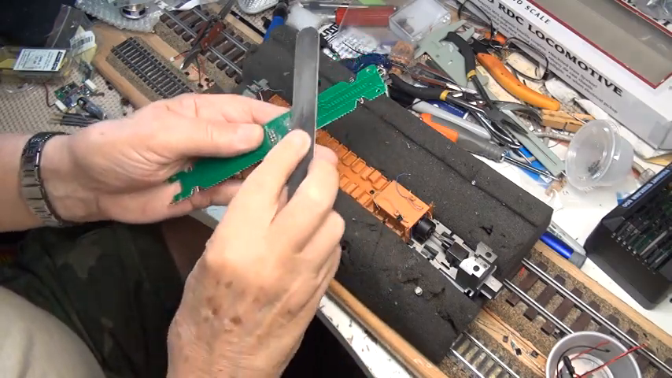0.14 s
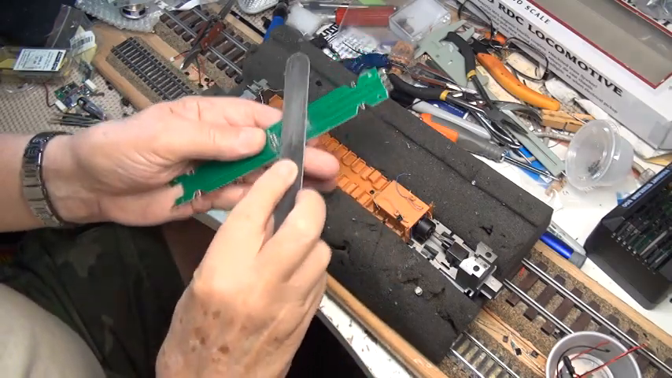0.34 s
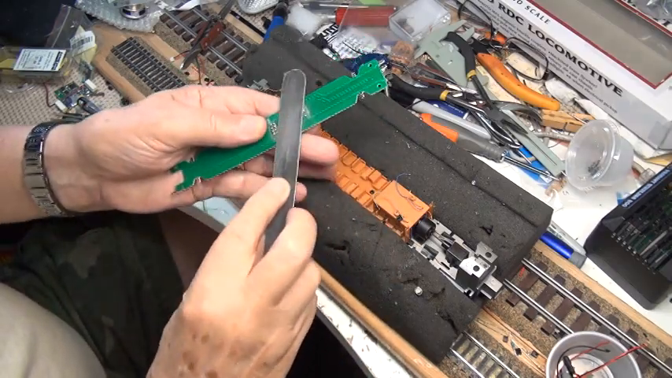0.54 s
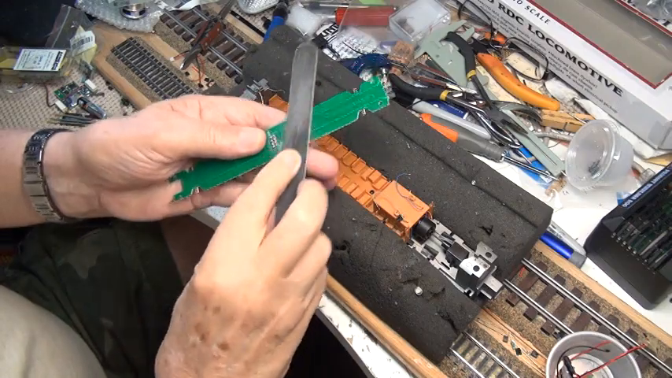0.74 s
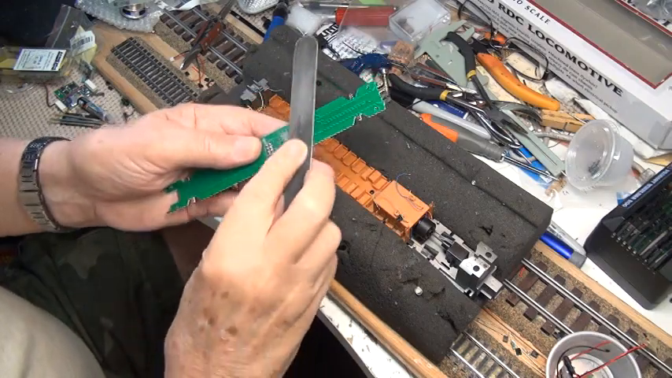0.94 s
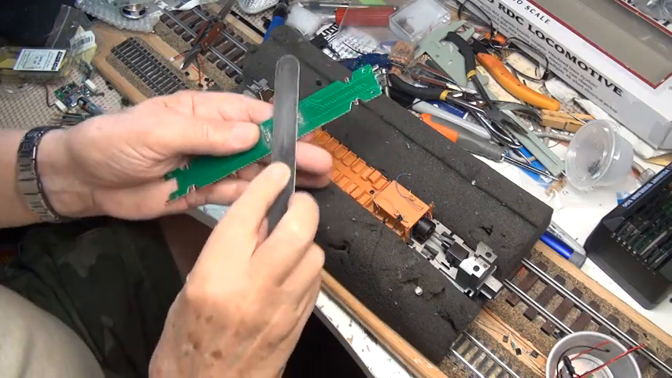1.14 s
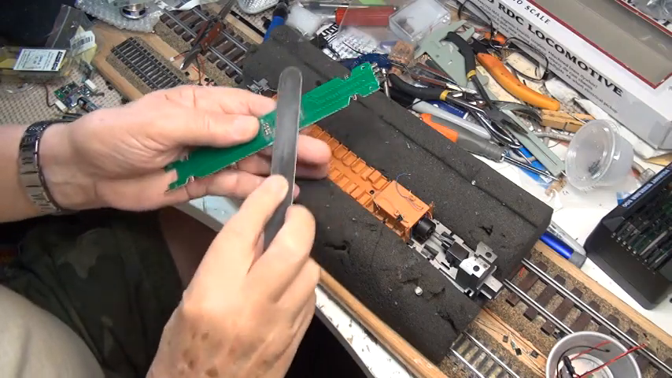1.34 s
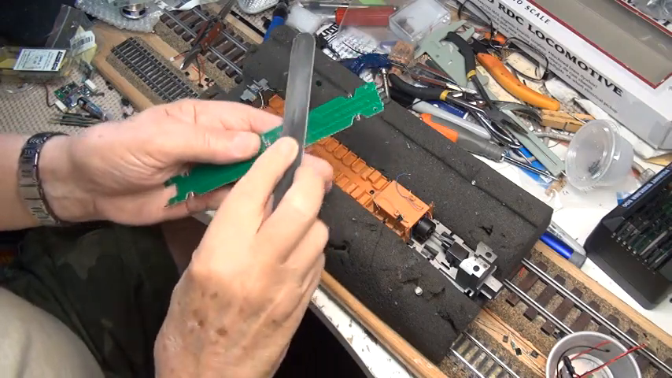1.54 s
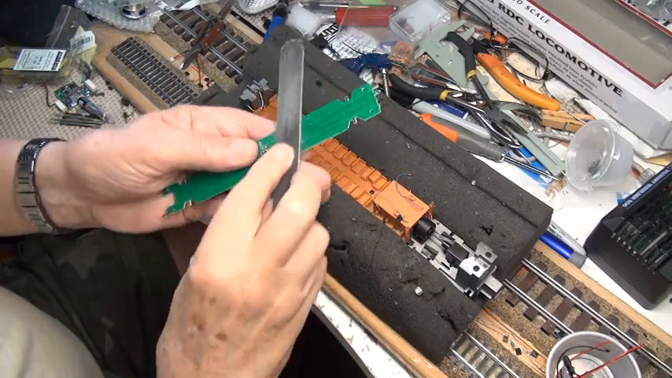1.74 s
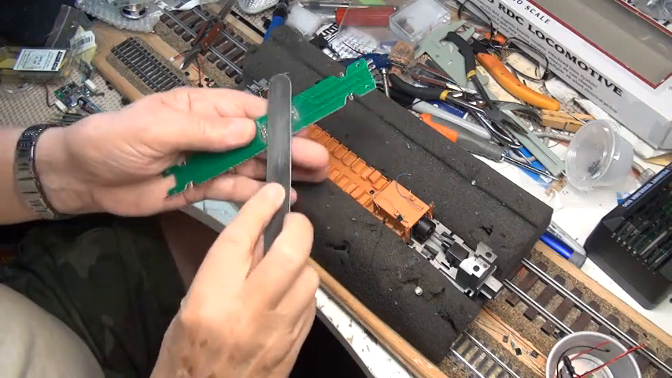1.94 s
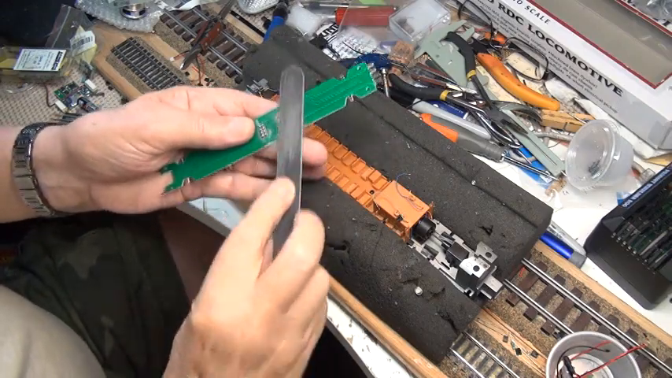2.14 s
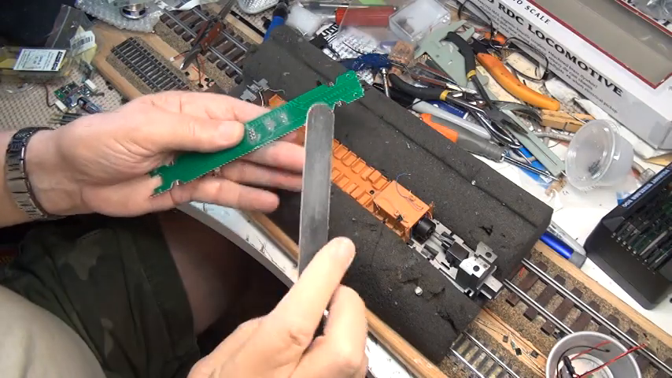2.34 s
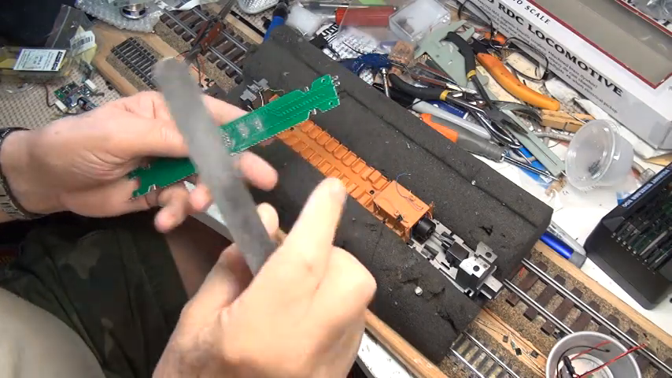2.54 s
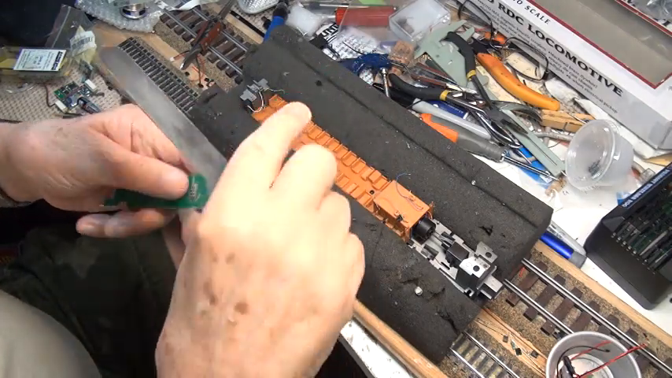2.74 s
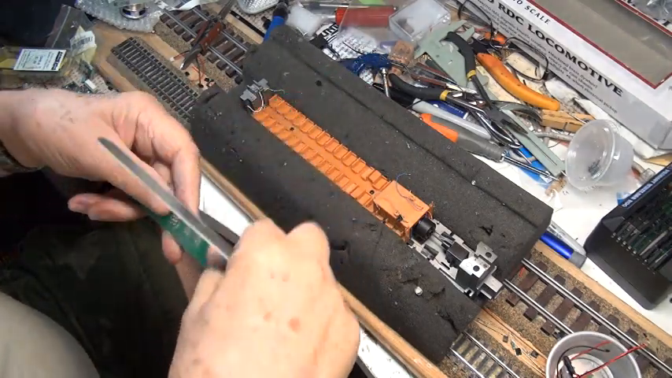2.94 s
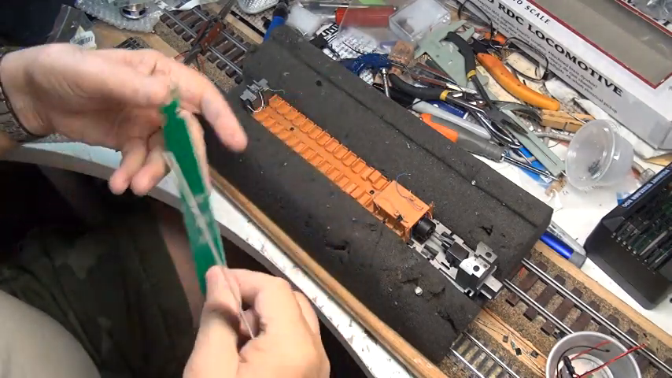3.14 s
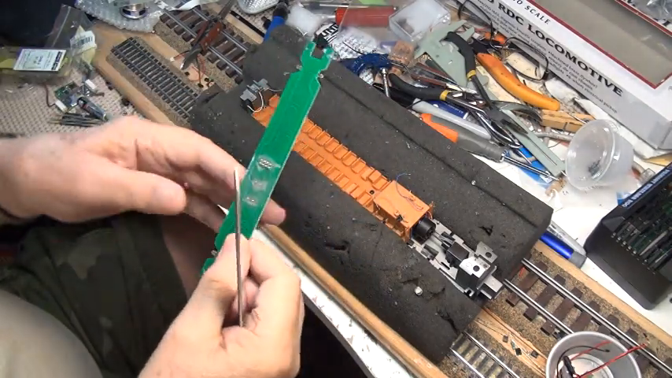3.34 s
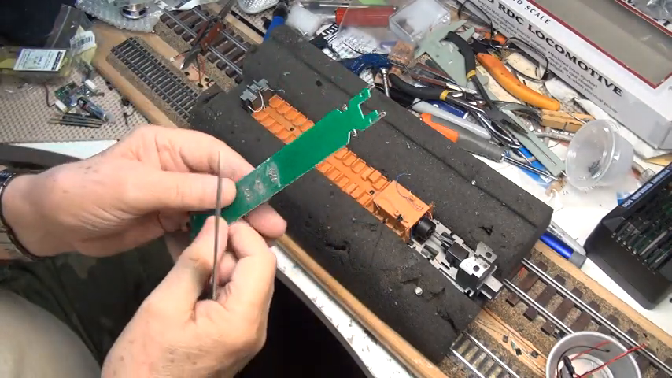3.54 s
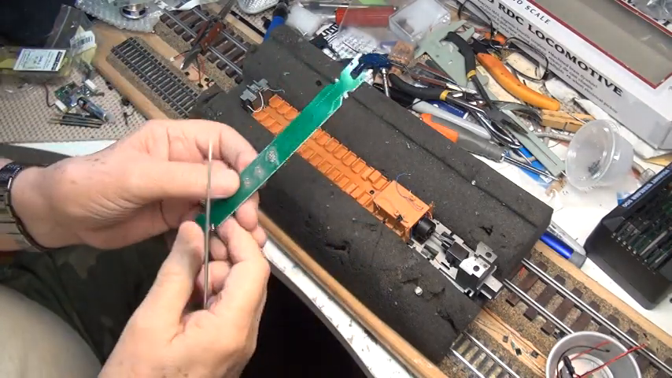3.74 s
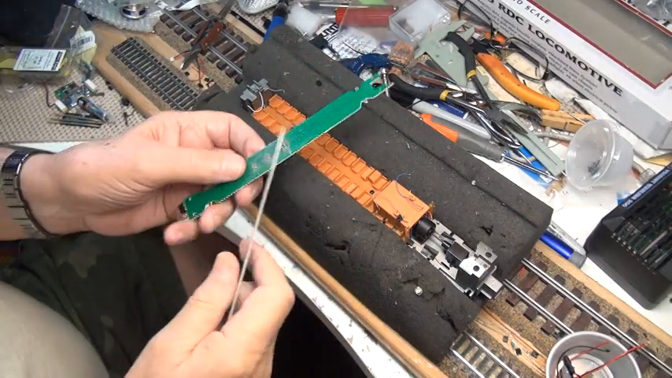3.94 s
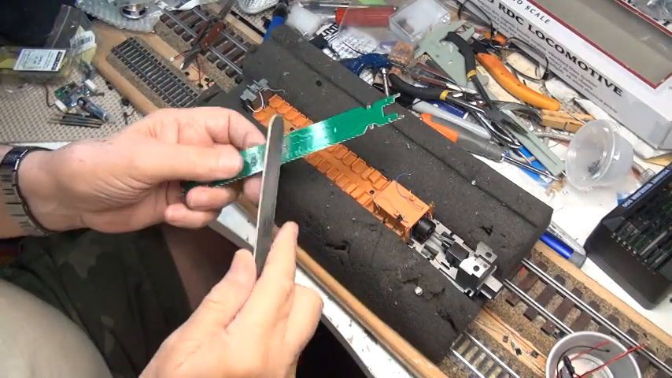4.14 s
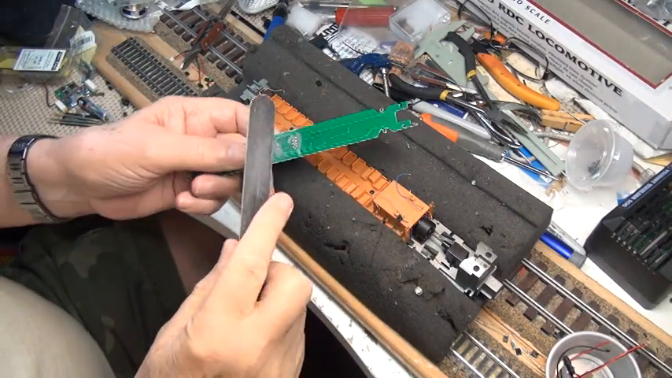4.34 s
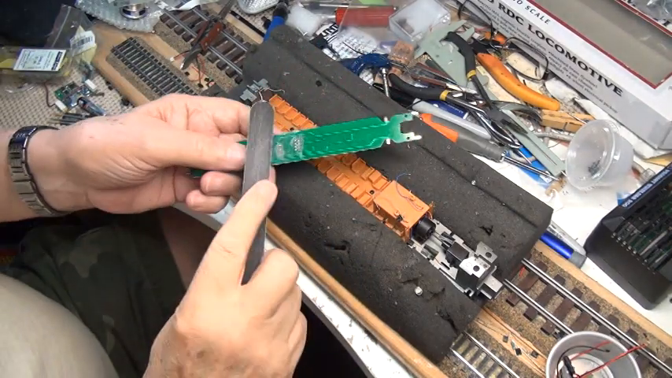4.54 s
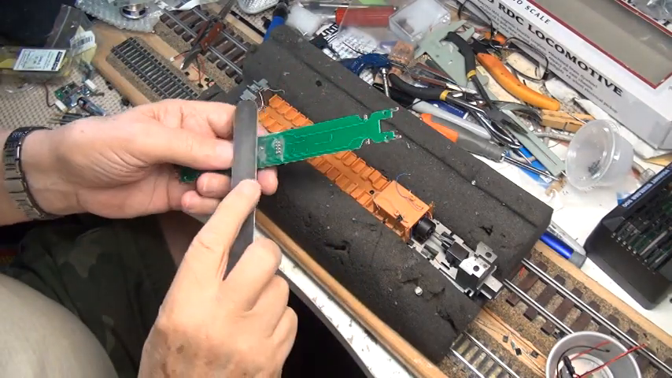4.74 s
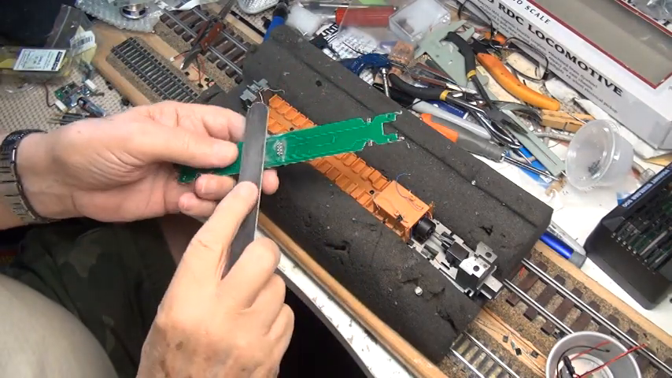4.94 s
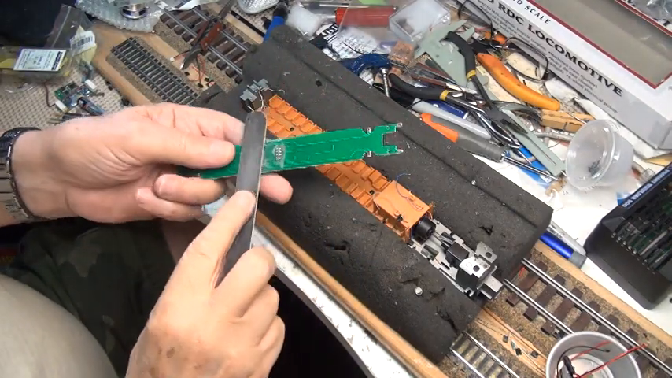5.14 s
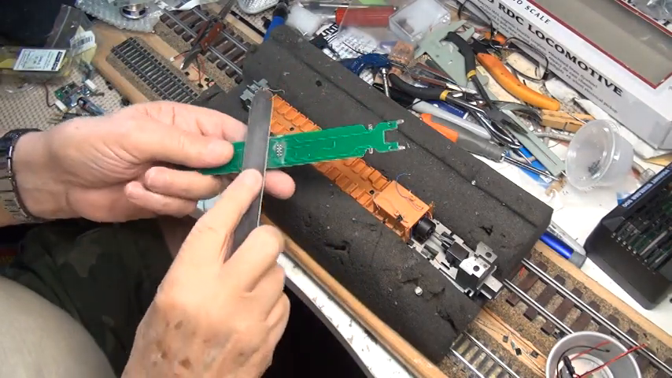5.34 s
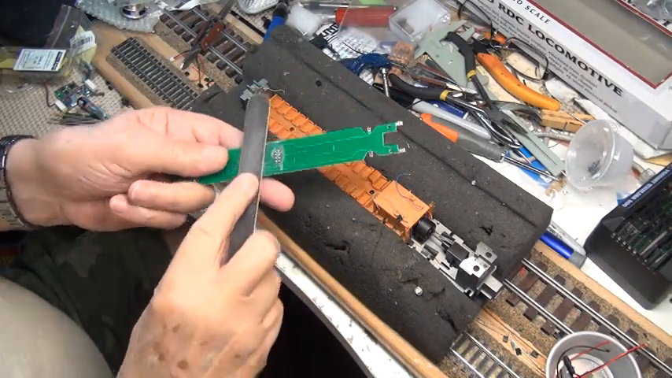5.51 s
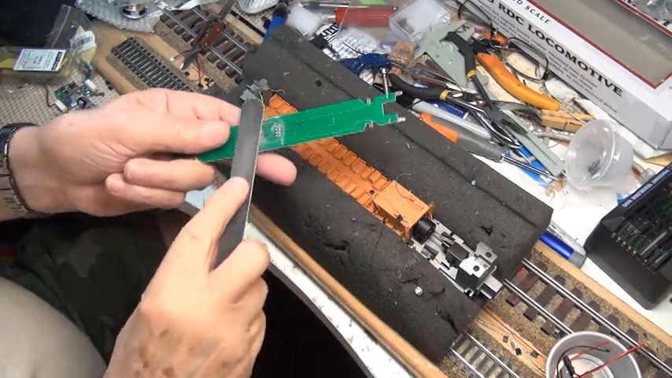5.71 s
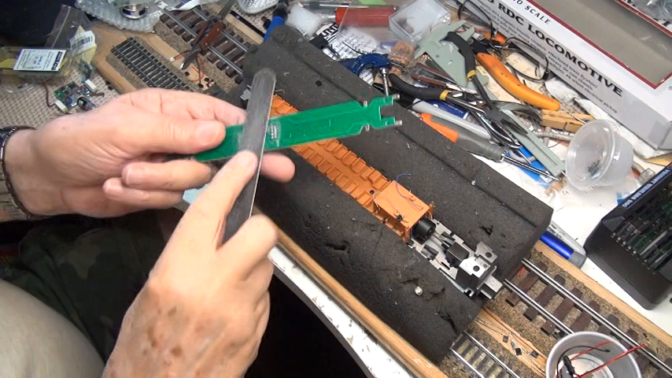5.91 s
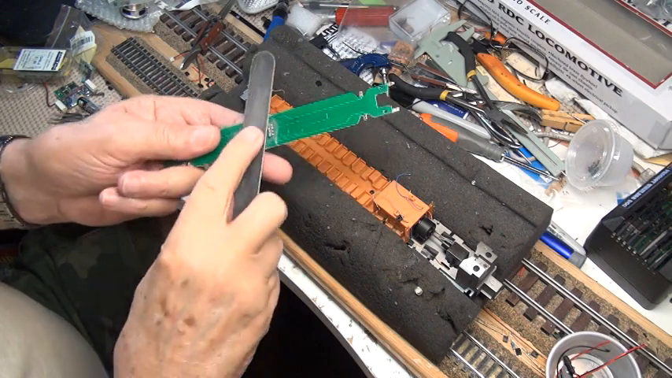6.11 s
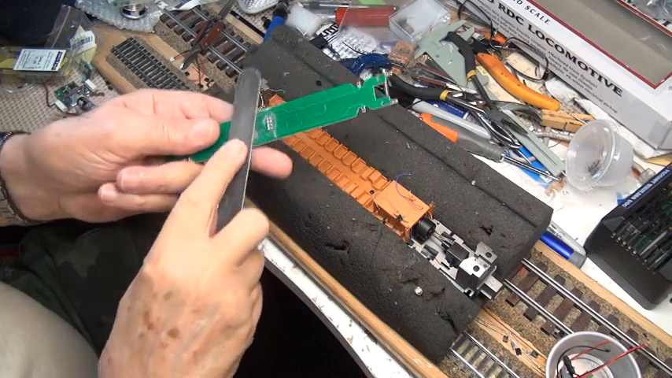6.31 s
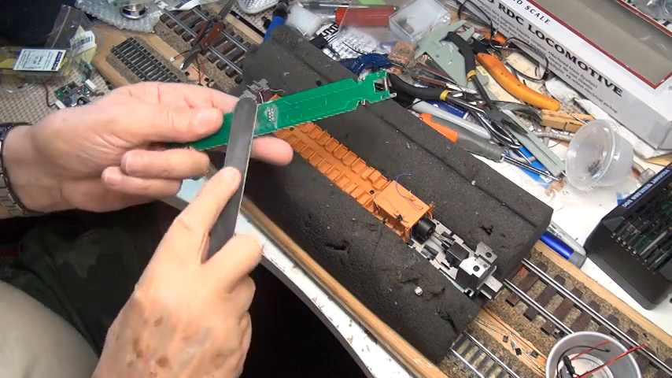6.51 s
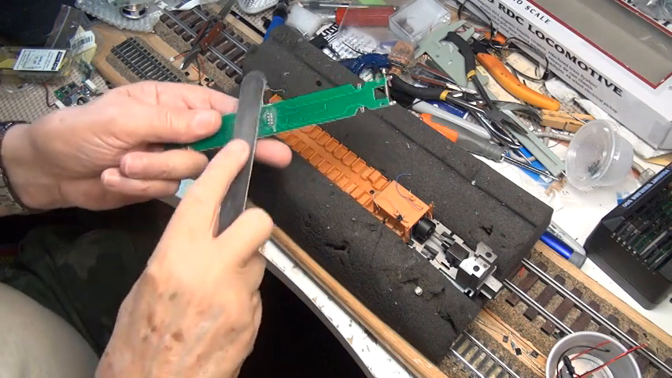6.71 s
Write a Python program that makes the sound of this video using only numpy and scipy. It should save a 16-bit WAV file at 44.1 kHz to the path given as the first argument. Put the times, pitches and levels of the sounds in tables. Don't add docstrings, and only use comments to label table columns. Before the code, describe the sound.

Scratchy metal filing in fast alternating strokes, a soft pause with light taps, then brighter filing again over a faint steady tone.

```python
import sys
import numpy as np
from scipy import signal
from scipy.fft import rfft, irfft, next_fast_len
from scipy.io import wavfile
from scipy.ndimage import uniform_filter1d, map_coordinates

SR = 44100
rng = np.random.default_rng(int(sys.argv[2]) if len(sys.argv) > 2 else 0)


def ratio_of_db(decibels):
    return 10 ** (np.asarray(decibels, float) / 20)


def transcribe(u):
    v = np.clip(np.atleast_2d(u).T, -1, 1)
    q = np.round(v * 32767).astype(np.int16)
    wavfile.write(sys.argv[1], SR, q)


N = 298557
T = np.arange(N) / SR


def unit(x):
    return x / np.sqrt(np.mean(x ** 2) + 1e-20)


def along(points, hz):
    f, v = np.transpose(points)
    return np.interp(np.log(hz + 1), np.log(f + 1), v)


def curves(rows):
    s, *cols = np.transpose(rows)
    return [np.interp(T, s, c) for c in cols]


def wobble(rate):
    knots = rng.standard_normal(int(N * rate / SR) + 4)
    return map_coordinates(knots, [T * rate])


def filtered(x, response):
    m = next_fast_len(N + 8192)
    return irfft(rfft(x, m) * response(np.fft.rfftfreq(m, 1 / SR)), m)[..., :N]


def causal(spectrum):
    def response(hz):
        cep = irfft(np.log(ratio_of_db(along(spectrum, hz)) + 1e-6))
        cep[1:len(hz) - 1] *= 2
        cep[len(hz):] = 0
        return np.exp(rfft(cep))
    return response


def mode(f, centre_hz, width_hz):
    return 1j * f * width_hz / (centre_hz ** 2 - f * f + 1j * f * width_hz)


def mottled(x, depth_db, twist, hz_bins, frames):
    z = signal.stft(x, nperseg=256)[2]
    field = rng.standard_normal((2, *z.shape))
    field = uniform_filter1d(uniform_filter1d(field, hz_bins, 1), frames, 2)
    field = uniform_filter1d(field, 2, 2) / field.std()
    patches = ratio_of_db(depth_db * field[0]) * np.exp(1j * twist * field[1])
    return signal.istft(z * patches, nperseg=256)[1][:N]


def filing():
    biting, progress, blade_hz, ring_db = strokes()
    lifted_db = np.clip(-110 * (T - sum(FIRST_STROKES[-1][:2])), -60, 0)
    idle = ratio_of_db(-47 + np.where(T < SECOND_STROKES[0][0], lifted_db, 0))
    pressure = np.hypot(biting, idle)
    force = teeth(rate=1100, spread_db=3.8, clump_db=1.5, give=4.5)

    start_db, end_db, rest_db, loose_db = -14, -9, -1, 8
    board_db = start_db + (end_db - start_db) * progress
    board_db = board_db + (rest_db - board_db) * (idle / pressure) ** 2
    board_db = board_db + loose_db * ((T > LIGHT_TOUCHES[0][0]) & (T < 5.02))

    ring = blade_ring(force, blade_hz, ring_db)
    return pressure * (wire_rasp(force) + board_shake(force, ring, board_db))


# (start [s], length [s], rasp level [dB], fall during stroke [dB], blade pitch at start [Hz])
FIRST_STROKES = [(-.025, 0.061, -17, 9, 1020), (0.071, 0.1, -19.5, 4, 2260), (.222, 0.099, -18.5, 6, 1030),
                 (0.347, 0.11, -16, 9, 1840), (0.49, 0.099, -18.5, 5.5, 940),
                 (0.618, .115, -19.5, 4.5, 1510), (0.766, 0.1, -19, 8, 1080), (0.891, .1, -17.5, 6.2, 1440),
                 (1.039, 0.082, -17.6, 5, 1055), (1.158, 0.11, -20, 1.7, 1610),
                 (1.314, 0.089, -20.5, -1.7, 956), (1.439, 0.11, -16.5, 6.5, 1970),
                 (1.58, 0.1, -17, 9, 934), (1.71, 0.11, -21.5, 2.2, 1600), (1.858, 0.1, -19.5, 3, 946),
                 (1.993, 0.1, -16.5, 14, 1830), (2.125, 0.13, -20.5, 0.3, 950)]
LIGHT_TOUCHES = [
    (4.78, .11, -53, -8, 2000),
    (4.936, 0.043, -31, 3.5, 2000),
    (5.0, .11, -51, 3, 2000),
    (5.124, 0.054, -30.5, 11.5, 2000),
    (5.224, 0.12, -28.5, 2.5, 2000),
]
SECOND_STROKES = [(5.39, 0.085, -19.5, 6, 2000), (5.517, 0.082, -16, 9, 2650),
                  (5.653, 0.078, -17.5, 4, 1350), (5.773, 0.1, -19, 4, 2400),
                  (5.927, 0.077, -16.5, 5.5, 1060), (6.052, 0.085, -21.5, 0.2, 2230),
                  (6.191, 0.086, -16.5, 6.5, 1320), (6.311, 0.1, -21.5, 0.5, 2400),
                  (6.466, 0.093, -14, 14.5, 1320), (6.596, 0.085, -20, 2.5, 2650),
                  (6.739, 0.038, -15.5, 3.5, 1700)]


def strokes():
    pressure, progress = np.zeros(N), np.ones(N)
    hz, ring_db = np.full(N, 1500.), np.zeros(N)
    grips = zip(
        (FIRST_STROKES, LIGHT_TOUCHES, SECOND_STROKES),
        (-26.5, -23, -20.5),
        (-.4, 1.1, 4.0),
        (0.029, 0.033, 0.042),
        (859, 700, 745),
        (.05, .1, 0.11), (0.907, 0.73, .92))
    for rows, share_db, law, bite_s, let_go_db, u0, u1 in grips:
        ends = [row[-1] for row in rows[1:]] + [2400]
        for (s, length, db, sag_db, hz0), hz1 in zip(rows, ends):
            now = slice(*np.searchsorted(T, [s, s + length + .2]))
            t = T[now] - s
            u = np.clip(t / length, 0, 1)
            fall_db = sag_db * u ** 1.27 + let_go_db * np.clip(t - length, 0, 1)
            bite = np.clip(t / bite_s, 0, 1) ** 0.76
            pressure[now] = np.maximum(pressure[now], bite * ratio_of_db(db - fall_db))
            travel = np.clip((u - u0) / (u1 - u0), 0, 1)
            free = hz0 ** law + (hz1 ** law - hz0 ** law) * (1 - np.cos(np.pi * travel)) / 2
            progress[now], hz[now] = u, free ** (1 / law)
            ring_db[now] = share_db - 3.5 * (1 - np.sin(np.pi * travel))
    return pressure, progress, hz, ring_db


# (time [s], share of single catches [0-1])
SINGLE_CATCHES = [
    (0, 0.41),
    (2.3, 0.4),
    (4.7, 0.22),
    (4.9, 0.66),
    (4.94, 0.3),
    (5.1, 0.5),
    (5.4, 0.45),
    (5.7, 0.2),
    (6.77, 0.29),
]


def teeth(rate, spread_db, clump_db, give):
    share = np.clip(curves(SINGLE_CATCHES)[0], 0, 1)
    catch = (rng.random(N) < rate / SR) * ratio_of_db(spread_db * rng.exponential(size=N))
    fading = signal.lfilter([1], [1, -np.exp(-1 / (.0003 * SR))], catch)
    bursts = fading * rng.standard_normal(N)
    force = np.sqrt(1 - share) * rng.standard_normal(N) + np.sqrt(share) * unit(bursts)
    force = unit(force * ratio_of_db(clump_db * wobble(350) + 0.53 * wobble(60)))
    return unit(np.tanh(force / give))


# (frequency [Hz], level [dB per Hz])
WIRES_BEFORE = [(1940, -47), (3300, -24), (5010, -6), (5440, -2), (6460, -0.5), (6970, 0.5), (7520, -7.5),
                (7960, -4), (9390, -1.5), (11300, -2), (12200, -6.5), (13200, -6.5), (14400, -9),
                (15000, -18)]
WIRES_AFTER = [(1940, -42.5), (3300, -10.5), (4070, -5.5), (4440, -20), (4920, -5), (6100, 4), (7420, 2),
               (8010, -4.5), (8640, 2.5), (9690, 1), (13100, -3.5), (15000, -12.5)]


def wire_rasp(force):
    touch = mottled(force, depth_db=2.5, twist=0, hz_bins=4, frames=7)
    before = unit(filtered(touch, causal(WIRES_BEFORE)))
    after = unit(filtered(touch, causal(WIRES_AFTER)))
    wires = np.where(T < 3.5, before, after)
    wires = filtered(wires, lambda f: 1 + ratio_of_db(-3) * mode(f, 9520, 400))
    top = filtered(wires, lambda hz: 1 / (1 + (7900 / (hz + 1)) ** 12))
    top_db = -2
    low_db = 10 * np.log10(1 - ratio_of_db(2 * top_db))
    return ratio_of_db(top_db - 1.15) * unit(top) + ratio_of_db(low_db - 0.8) * unit(wires - top)


def blade(force, hz, width_hz):
    turn = np.exp(2j * np.pi * np.cumsum(hz) / SR)
    pole = np.exp(-np.pi * width_hz / SR)
    held = signal.lfilter([1], np.poly([pole, pole]), force / turn)
    return unit((held * turn).real)


def blade_ring(force, blade_hz, ring_db):
    narrow, wide = blade(force, blade_hz, width_hz=190), blade(force, blade_hz, width_hz=380)
    low = np.where(T < LIGHT_TOUCHES[0][0], narrow, wide)
    high = ratio_of_db(-6.5) * blade(force, 2.6 * blade_hz, width_hz=240)
    ring = ratio_of_db(ring_db) * (low + high)
    return ratio_of_db(-4) * ring + ratio_of_db(-7.5) * filtered(ring, board)


# (frequency [Hz], width [Hz], level [dB])
BOARD_MODES = [(1350, 1500, 2.5), (2000, 730, 11.5), (3050, 300, 10.5), (3340, 450, 8.5), (4500, 860, 10)]


def board(f):
    return sum((-1) ** k * ratio_of_db(db) * mode(f, c, w) for k, (c, w, db) in enumerate(BOARD_MODES))


def board_shake(force, ring, board_db):
    shake = mottled(force, depth_db=1.6, twist=2.5, hz_bins=2, frames=9)
    loose = unit(filtered(shake, board))
    tight = unit(filtered(shake, lambda f: board(f) * (f / 3000) ** 0.23))
    body = ratio_of_db(board_db - 2.5) * np.where(T < 5.2, loose, tight) + ratio_of_db(3.5) * ring
    touch_gain = np.where(T < 5.02, 4, 2) * (T < SECOND_STROKES[0][0])
    free_end = ratio_of_db(4.5) * ring + ratio_of_db(board_db + 4.5) * touch_gain * force
    body = body + filtered(free_end * (T > LIGHT_TOUCHES[0][0]), lambda f: mode(f, 2050, 240))
    return filtered(body, lambda f: 1 - .65 * mode(f, 1630, 350))


# (time [s], wire peak level [dB], board knock level relative to the wire [dB])
SNAGS = [(0.2912, -9, -54), (0.373, -16, -26), (0.8244, -8, -32), (0.851, -7.5, -28), (1.946, -12, -30),
         (4.6635, -23, -2), (4.825, -27, -17), (4.8489, -27, -6.5), (4.8614, -39, -13), (4.8872, -23, -9.5),
         (5.151, -15.5, -17), (5.1612, -15.5, -12.5), (5.245, -16, -18), (5.2831, -16, -28),
         (5.3277, -16, -16), (5.3847, -21, -18), (5.404, -13, -13), (5.4286, -7, -29), (5.4559, -11, -24)]


def catches():
    out, tick, t = np.zeros(N + SR), np.arange(N) == 0, np.arange(300) / SR
    wire = filtered(tick, causal(WIRES_AFTER))[:300]
    plate = filtered(tick, board)[:300]
    for s, db, knock_db in SNAGS:
        burst = rng.standard_normal(300) * ratio_of_db(-60 * t / .0045)
        for body, level_db in ((wire, db + 1), (plate, db + knock_db + 4)):
            hit = np.convolve(burst, body)
            out[round(s * SR):][:len(hit)] += ratio_of_db(level_db) * hit / np.abs(hit).max()
    return out[:N]


# (middle time [s], half length [s], level [dB])
FINGER_SLIDES = [(2.29, 0.028, -47), (2.493, 0.09, -57), (2.548, 0.072, -42), (2.615, 0.03, -46),
                 (2.863, 0.011, -56), (2.93, 0.095, -53.5), (3.145, 0.045, -54), (3.24, 0.043, -61.5),
                 (3.594, 0.14, -59.5), (3.71, .05, -58), (3.868, 0.14, -55), (3.953, 0.031, -50.5),
                 (4.12, 0.0546, -48), (4.315, .13, -49.5), (4.506, 0.027, -44.5), (4.633, .06, -56),
                 (4.72, 0.013, -50), (4.797, 0.035, -46)]
# (frequency [Hz], level [dB per Hz])
SKIN_COLOUR = [(1470, -39), (2500, -1.5), (2850, -8.5), (4050, -2.5), (5210, -5.5), (6660, 2), (8580, -9),
               (9080, -4.5), (10100, -3), (14000, -6.5)]


def fingers():
    slides = sum(ratio_of_db(db - 21 * (np.abs(T - s) / half) ** 1.13) for s, half, db in FINGER_SLIDES)
    moving = (T > FINGER_SLIDES[0][0]) & (T < FINGER_SLIDES[-1][0])
    skin = rng.standard_normal(N) * ratio_of_db(1.5 * wobble(200))
    rub = mottled(skin, depth_db=3, twist=0, hz_bins=4, frames=12)
    return moving * (slides + ratio_of_db(-71)) * unit(filtered(rub, causal(SKIN_COLOUR)))


# (frequency [Hz], time to fall 60 dB [s])
ROOM_DECAY = [(500, .3), (4000, .26), (12000, .18)]


def room(x):
    hz, t, z = signal.stft(rng.standard_normal((2, SR // 2)), SR, nperseg=256)
    decay = ratio_of_db(-60 * t / along(ROOM_DECAY, hz)[:, None])
    tail = signal.istft(z * decay, SR, nperseg=256)[1]
    return signal.fftconvolve(x[None], tail / np.linalg.norm(tail[0]), axes=1)[:, :N]


# (frequency [Hz], level [dB per Hz])
HISS_COLOUR = [(15, -61), (25, -39), (85, -15), (260, -15.5), (365, -13.5), (416, -11.5), (682, -10.5),
               (862, -6.5), (982, -7), (1570, -10.0), (3340, -18.5), (7110, -24), (8310, -30), (12600, -33),
               (16400, -69.5), (22000, -120)][:-1] + [(16000, -50)]
# (frequency [Hz], likeness [0-1])
HISS_LIKENESS = [(60, 1.0), (130, 1.0), (290, 1), (640, 0.968), (1410, 0.88), (3100, 0.72), (6820, 0.84),
                 (15000, 0.67)]
# (time [s], frequency [Hz], level [dB])
STEADY_TONE = [
    (0, 863, -54.5),
    (2.3, 863, -54),
    (3.0, 861, -53),
    (4.5, 860.5, -55),
    (5.5, 860, -56.5),
    (6.77, 860, -57),
]
# (frequency [Hz], level [dB])
HUM_TONES = [(90, -76.5), (201, -76.5), (269, -71.5), (359, -70.5), (479, -72), (767, -69)]
# (start [s], end [s], frequency [Hz], level [dB])
LENS_WHINE = [
    (2.3, 2.62, 6110, -73),
    (2.95, 3.5, 7321, -74),
    (3.5, 4.17, 6094, -72),
    (2.6, 4.3, 7171, -82),
]


def air():
    turn = lambda hz: np.arccos(np.clip(along(HISS_LIKENESS, hz), -1, 1)) / 2
    spread = lambda hz: ratio_of_db(along(HISS_COLOUR, hz)) * [np.cos(turn(hz)), np.sin(turn(hz))]
    mid, side = filtered(rng.standard_normal((2, N)), spread)
    hiss = ratio_of_db(-50 + .3 * wobble(3)) * unit(np.array([mid + side, mid - side]))

    hz, db = curves(STEADY_TONE)
    phase = 2 * np.pi * np.cumsum(hz + 0.49 * wobble(5.88)) / SR
    tone_db = db + 0.21 * wobble(5.12) + np.array([[2.8], [-4.5]])
    tone = np.sqrt(2) * ratio_of_db(tone_db) * np.sin(phase + np.array([[.2], [-.2]]))

    hum = sum(ratio_of_db(db + 2.5 + 2.3 * wobble(3.9)) * np.sin(2 * np.pi * hz * T + 1.4 * wobble(2.95))
              for hz, db in HUM_TONES)
    whine = sum(ratio_of_db(db + 5.5 + 1.5 * wobble(8.1)) * ((T > t0) & (T < t1)) * np.sin(2 * np.pi * hz * T)
                for t0, t1, hz, db in LENS_WHINE)
    return hiss + tone + hum + whine


def scene():
    work = filing() + catches() + fingers()
    other = mottled(work, depth_db=-1.0, twist=2.81, hz_bins=3, frames=9)
    side = filtered(other, lambda hz: ratio_of_db(-10.5) / (1 + (4600 / (hz + 1)) ** 6))
    direct = work * ratio_of_db([[.2], [-.2]]) + np.array([side, -side])
    return direct + ratio_of_db(-19) * room(work) + air()


def roll_off(x):
    return signal.sosfilt(signal.butter(12, 15920, fs=SR, output="sos"), x)


# (upper edge [Hz], treble level that opens the next band [dB])
TOP_BANDS = [(12950, -64), (13700, -56.5), (14400, -35), (15160, -9), (15850, 9)]


def record(dry):
    dry = dry / (1 + np.abs(dry / .52) ** 4) ** .25
    treble = filtered(dry.mean(0), lambda hz: (hz > 8000) & (hz < 13000))
    power = np.abs(uniform_filter1d(treble ** 2, 2048))
    hz, t, z = signal.stft(dry, SR, nperseg=1024)
    level_db = np.interp(t, T, 10 * np.log10(power + 1e-12))
    edge_hz, opens_db = np.transpose(TOP_BANDS)
    open_bands = np.searchsorted(np.sort(opens_db), level_db)
    top_hz = edge_hz[np.minimum(open_bands, len(TOP_BANDS) - 1)]
    kept = signal.istft(z * (hz[:, None] < top_hz), SR, nperseg=1024)[1][:, :N]
    return roll_off(kept)


dry = scene()
out = record(dry)
transcribe(out)
```